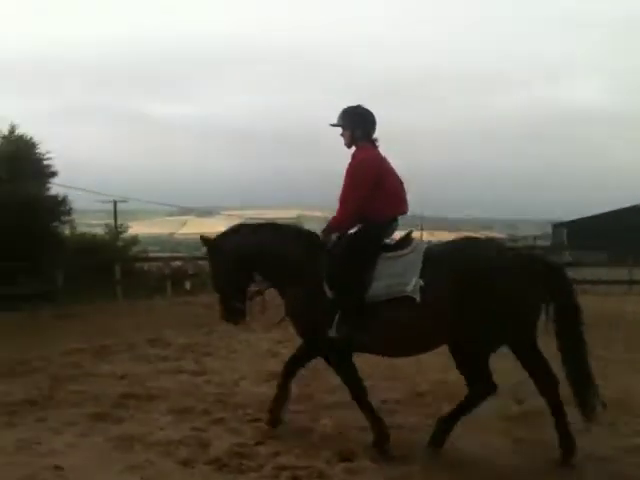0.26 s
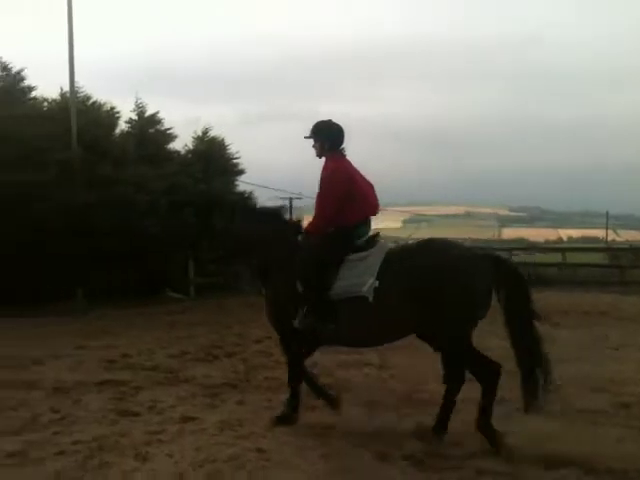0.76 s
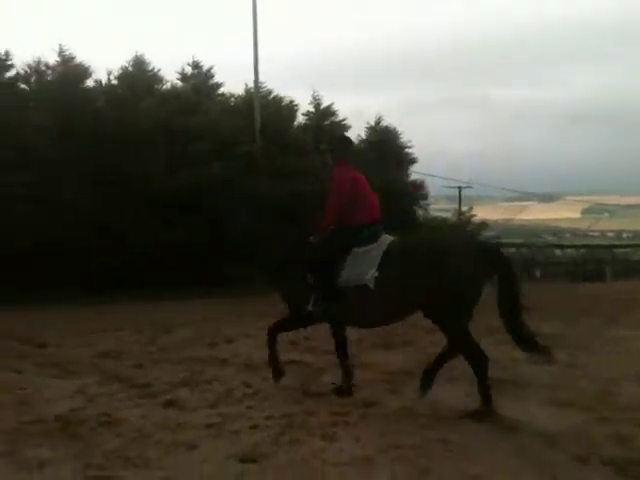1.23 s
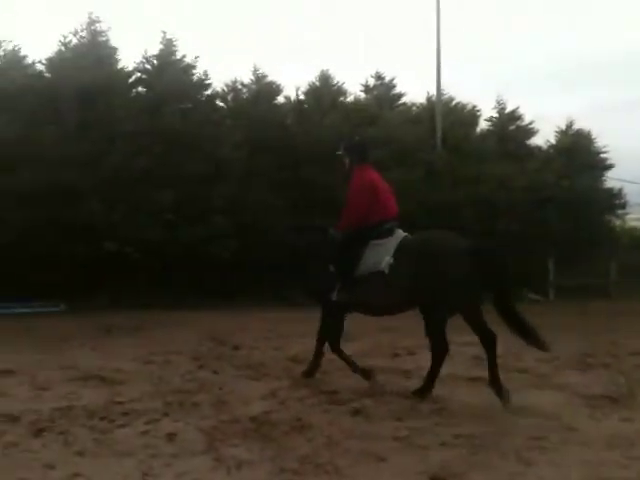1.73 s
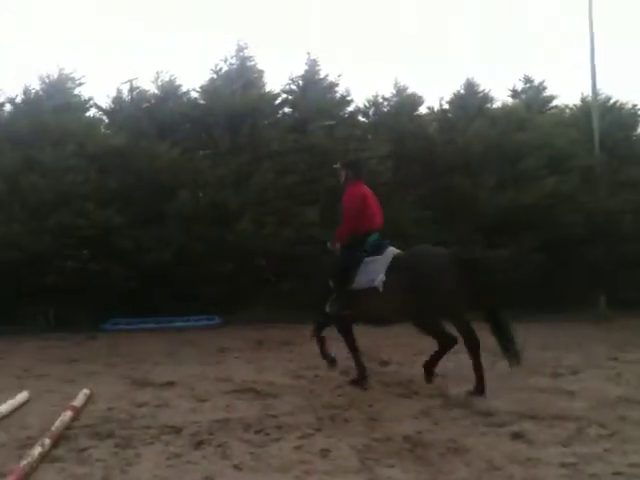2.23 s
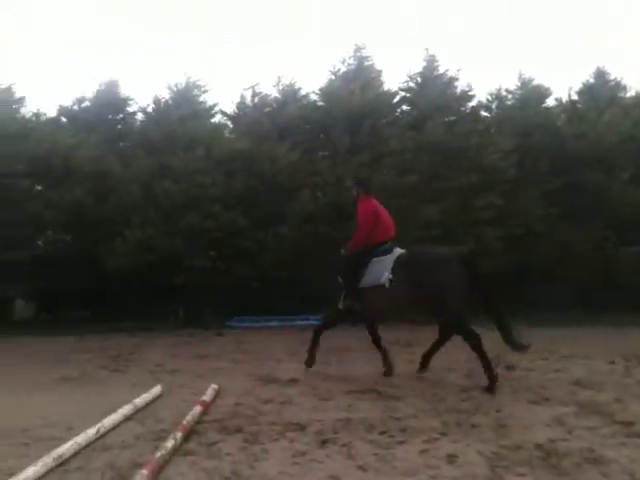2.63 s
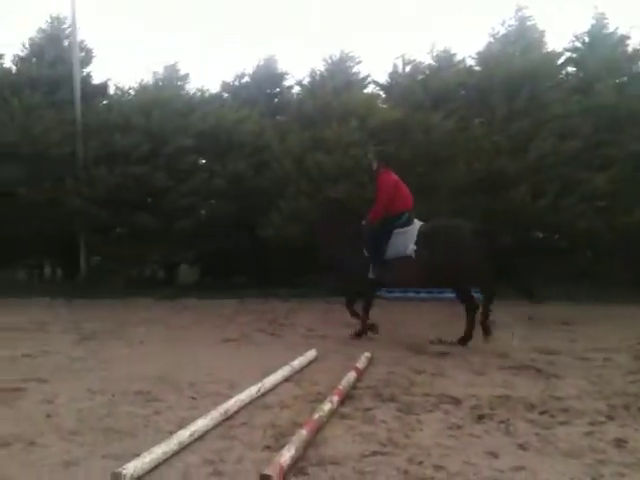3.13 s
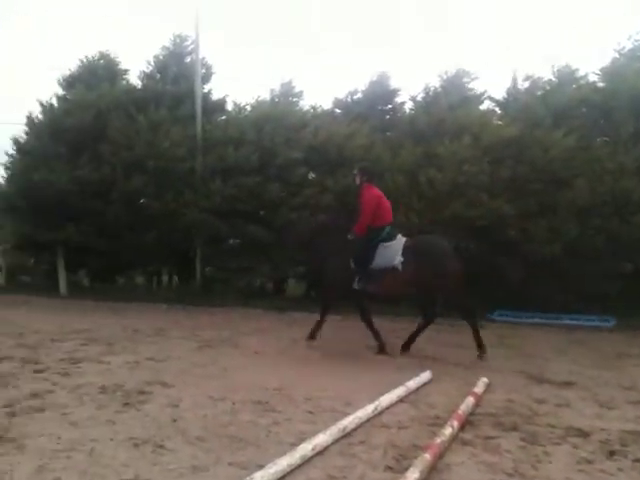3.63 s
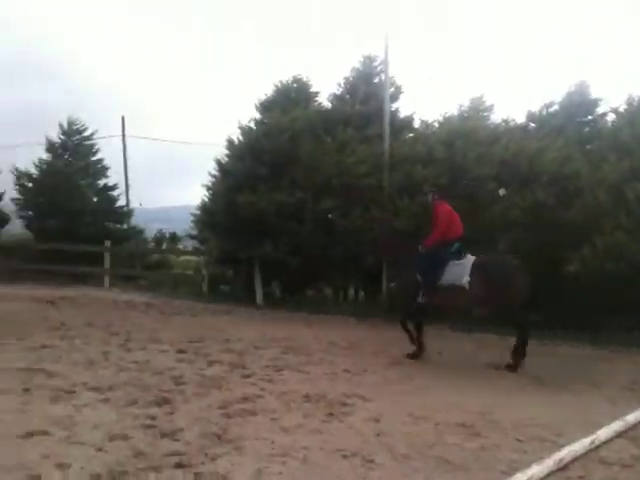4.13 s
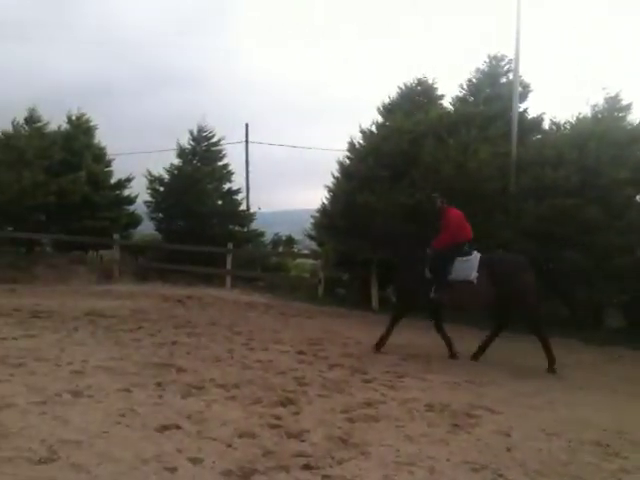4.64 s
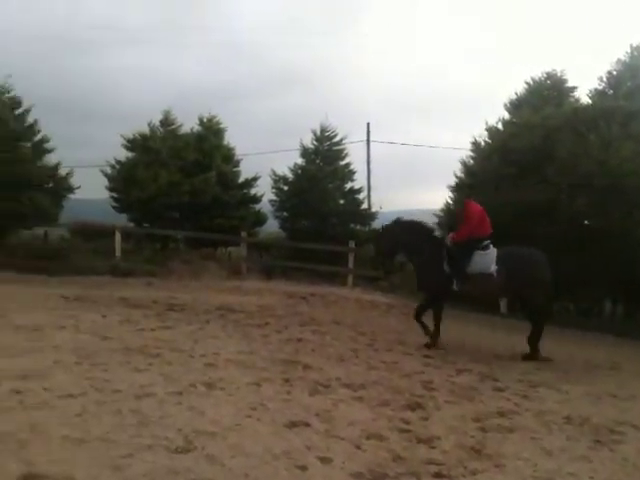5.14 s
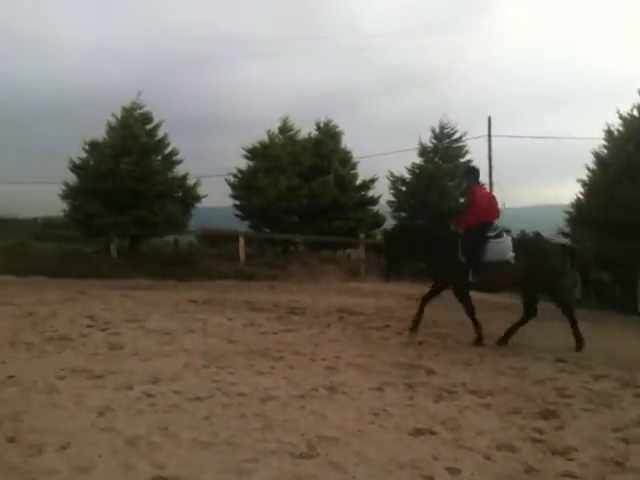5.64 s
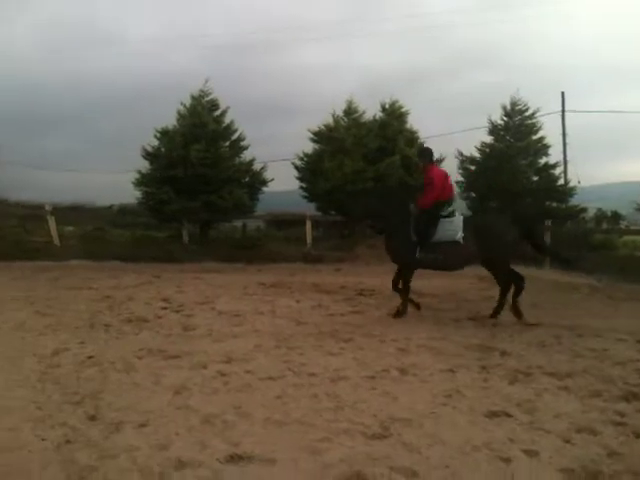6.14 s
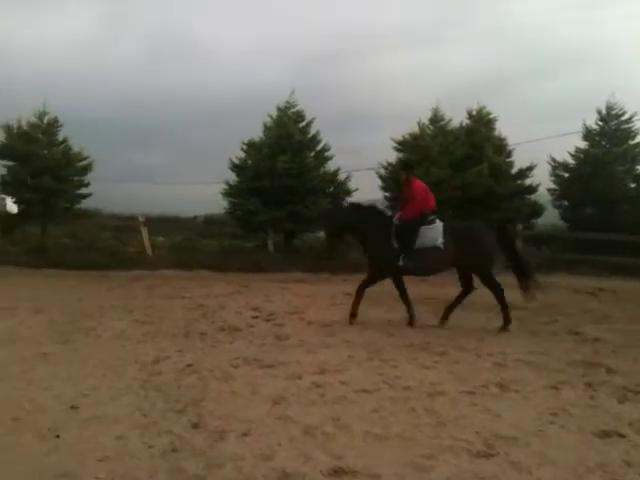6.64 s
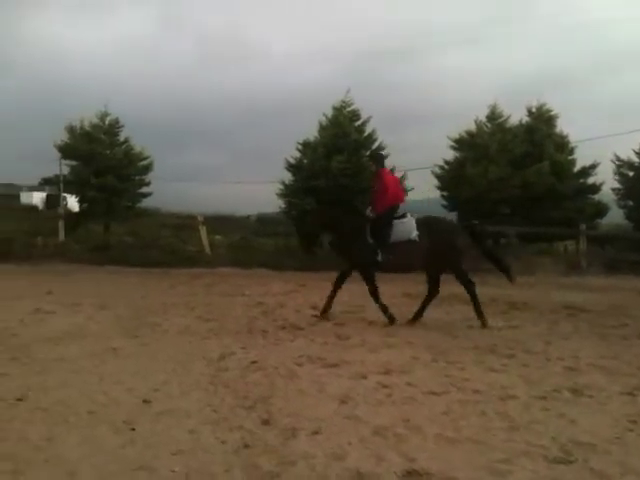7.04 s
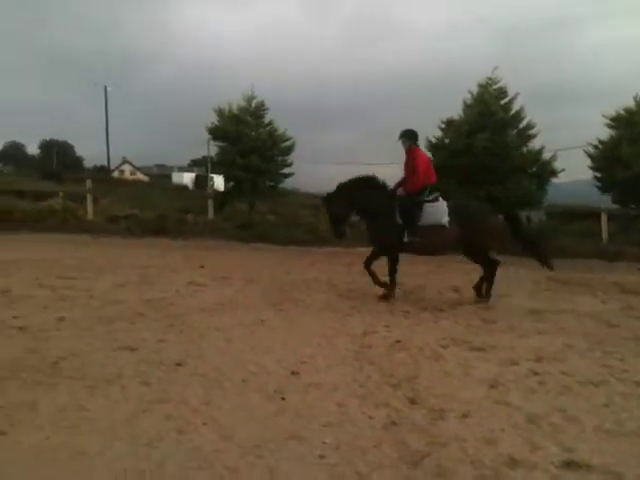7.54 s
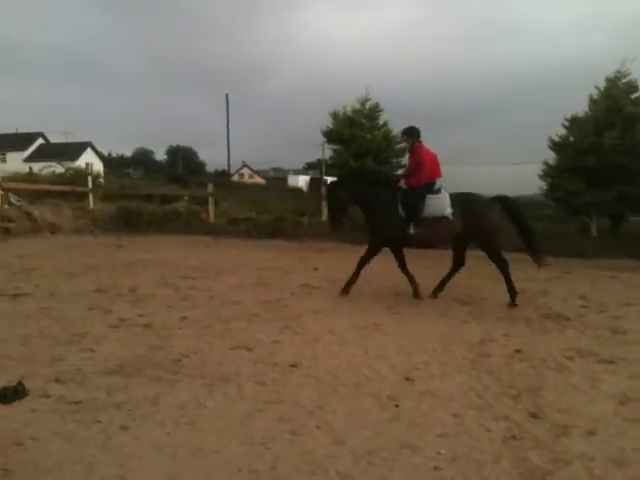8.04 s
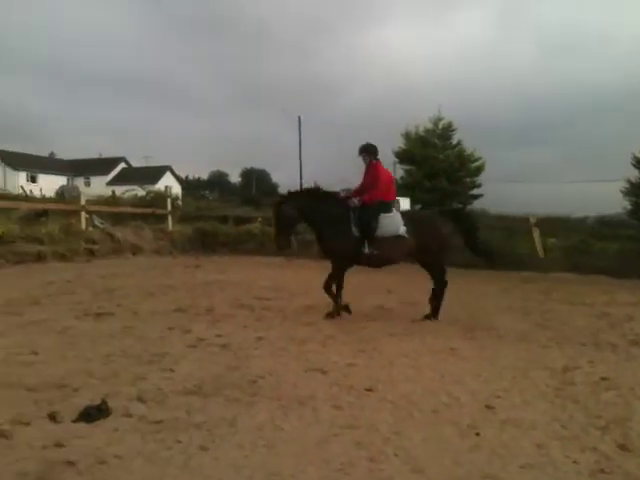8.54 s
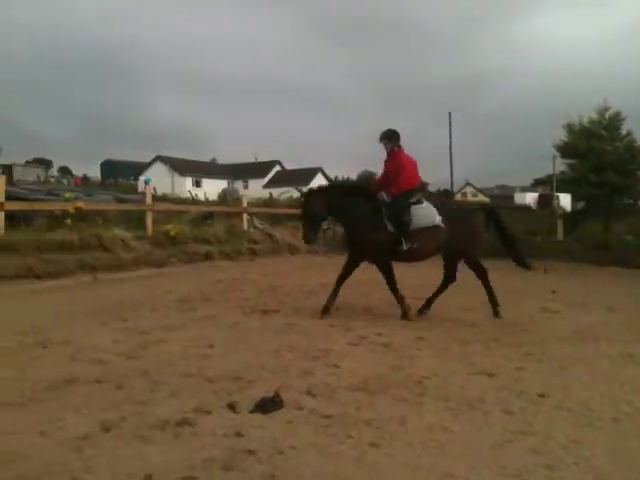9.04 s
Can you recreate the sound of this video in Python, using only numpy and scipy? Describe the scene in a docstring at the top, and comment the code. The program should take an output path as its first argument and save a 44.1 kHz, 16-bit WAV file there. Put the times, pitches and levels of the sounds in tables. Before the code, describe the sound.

Quiet open air, very soft overall. Muffled trotting hooves push and land in sand, with scrapes, brief slides and fine grain spray. Bumpy low wind thumps swell in the middle and return between six and nine seconds, often covering the steps. Tiny gliding squeaks like tack and crisp ticks appear irregularly. A horse snorts once, short and flapping, after the midpoint, and a faint rasp rises at the very end.

```python
"""Outdoor sand arena: a horse trots round at nearly three beats a second. Push-offs and landings are enveloped
grain noise plus damped clods; the spray dulls as the horse moves away. Toe scrapes, slides and fine sand are
shaped noise, hoof knocks damped tones. Gusts are lumpy filtered noise with low eddy swings at the microphone.
Thin high gliding squeaks, dry ticks, one snort of flapping pops and a faint late rasp stand out of quiet air noise."""
import sys
import numpy as np
from scipy.fft import rfft, irfft, next_fast_len
from scipy.io import wavfile
from scipy.ndimage import uniform_filter1d, map_coordinates

SR = 44100
rng = np.random.default_rng(int(sys.argv[2]) if len(sys.argv) > 2 else 0)


def waveform_to_disk(signal):
    """Save audio, clipped to [-1, 1], as 16-bit WAV at the path in sys.argv[1]."""
    frames = np.transpose(np.atleast_2d(signal))
    scaled = np.clip(frames, -1, 1) * 32767
    samples = np.round(scaled).astype(np.int16)
    wavfile.write(sys.argv[1], SR, samples)


N = 409248


def amp(db):
    """Decibels to gain."""
    return 10 ** (np.asarray(db) / 20)


def unit(x):
    """Scale to rms 1."""
    return x / np.sqrt(np.mean(x ** 2) + 1e-20)


def noise():
    """White noise over the whole scene."""
    return rng.standard_normal(N)


def clock(length_s):
    """Sample times [s] over length_s."""
    return np.arange(int(length_s * SR)) / SR


def add(track, start_s, sound):
    """Mix a sound into the track at start_s, or at 0 if that is negative."""
    start = max(round(start_s * SR), 0)
    part = track[start:start + len(sound)]
    part += sound[:len(part)]


def wobble(rate_hz):
    """Smooth random curve with rate_hz knots a second."""
    knots = rng.standard_normal(int(N * rate_hz / SR) + 4)
    return map_coordinates(knots, [np.arange(N) * rate_hz / SR])


def coloured(x, spectrum):
    """Minimum-phase filter through (Hz, dB) points, output at rms 1."""
    size = 2 * next_fast_len(len(x) // 2 + 4096)
    hz, db = np.transpose(spectrum)
    bin_hz = np.fft.rfftfreq(size, 1 / SR)
    log_gain = np.log(amp(np.interp(np.log(bin_hz + 1), np.log(hz), db)))
    # folding the cepstrum onto positive times makes the filter causal
    cepstrum = irfft(log_gain)
    cepstrum[1:size // 2] *= 2
    cepstrum[size // 2 + 1:] = 0
    response = np.exp(rfft(cepstrum))
    return unit(irfft(rfft(x, size) * response)[:len(x)])


def grains(rate_hz, spread_db):
    """Tiny impacts of random timing and size, rate_hz a second on average."""
    hits = rng.random(N) < rate_hz / SR
    return hits * rng.standard_normal(N) * amp(spread_db * rng.standard_normal(N))


def stroke(t, hold_s, rise_s, fall_s):
    """Exponential rise, hold until hold_s, exponential decay."""
    return (1 - np.exp(-t / rise_s)) * np.exp(-np.maximum(t - hold_s, 0) / fall_s)


# open air: (frequency [Hz], relative density [dB])
AIR_SPECTRUM = [(15, -44), (25, -24), (64, -18.5), (161, 6), (342, -1.5), (542, 2.5), (710, -4.5), (812, 0),
                (1090, -6), (1980, -7.5), (3050, -13), (4330, -9.5), (8270, -13), (14600, -19),
                (15800, -16.5)]


def air(level_db=-67.5, drift_db=-1.26):
    """Steady broadband hush whose level drifts a little."""
    return amp(level_db + drift_db * wobble(11)) * coloured(noise(), AIR_SPECTRUM)


# light air between gusts: (time [s], level before trim [dB])
LULL = [(0, -65), (.6, -59.5), (.9, -81), (1.5, -67.5), (2.8, -77), (3.3, -61.5), (3.9, -53), (4.8, -66),
        (5.35, -66.5), (5.9, -70), (6.3, -59.5), (6.78, -70), (7.2, -54), (8, -56), (9.2, -60.5)]
# gusts: (time [s], length [s], level at the end of the swell, before trim [dB])
GUSTS = [(0.055, 0.095, -59.5), (0.383, 0.08, -53), (1.768, 0.068, -60.5), (3.077, 0.098, -59.5),
         (3.334, 0.15, -48.5), (3.517, 0.16, -49.5), (3.888, 0.22, -50), (4.178, 0.17, -44.5),
         (4.28, 0.12, -45.5), (4.515, 0.24, -51), (4.821, 0.038, -58.5), (5.013, 0.023, -60),
         (6.18, .1, -66.5), (6.46, 0.042, -51.5), (6.554, 0.15, -52.5), (6.831, 0.22, -47),
         (7.1, 0.038, -52), (7.252, 0.17, -54.5), (7.548, 0.13, -55), (7.695, 0.05, -44.5),
         (7.793, 0.041, -48.5), (7.895, 0.041, -53), (8.1, 0.072, -55), (8.469, 0.2, -47),
         (8.72, 0.032, -45), (8.965, 0.23, -55)]
GUST_RISE_S, GUST_FALL_S, GUST_SWELL_DB = 0.0046, 0.03, 2


def flow_db():
    """Wind strength: each gust arrives, keeps growing to its end, then collapses into the light air."""
    flow = amp(np.interp(np.arange(N) / SR, *np.transpose(LULL)))
    for start_s, length_s, db in GUSTS:
        t = clock(length_s + 0.3)
        swell_db = GUST_SWELL_DB * np.minimum(t / length_s - 1, 0)
        add(flow, start_s, amp(db + swell_db) * stroke(t, length_s, GUST_RISE_S, GUST_FALL_S))
    return 20 * np.log10(flow)


# buffeting in a breeze: (frequency [Hz], relative density [dB])
BREEZE_SPECTRUM = [(25, -68), (50, -28.5), (80, -11), (120, 0.5), (180, -0.5), (260, -11.5), (350, -20),
                   (500, -44.5), (900, -59.5), (2000, -65)]
# buffeting in a hard gust: (frequency [Hz], relative density [dB])
GUST_SPECTRUM = [(25, -30), (50, -42), (80, -36), (120, -2), (190, -0.5), (270, 1), (370, -13),
                 (520, -21.5), (900, -35), (2000, -53.5)]


def buffeting(trim_db=-2.5, lump_db=4.5, hard_db=-43, calm_db=-62):
    """Turbulence on the microphone: stronger flow is louder and brighter."""
    level_db = flow_db()
    hardness = 1 / (1 + amp(2 * (hard_db - level_db)))
    turbulence = noise()
    soft = (1 - hardness) * coloured(turbulence, BREEZE_SPECTRUM)
    hard = hardness * coloured(turbulence, GUST_SPECTRUM)
    swirl = (soft + hard) * amp(lump_db * wobble(45))
    # level out slow power changes, so the flow sets the slow level
    power = uniform_filter1d(uniform_filter1d(swirl ** 2, size=3200), size=2000)
    swirl = swirl / np.sqrt(np.abs(power) + 1e-6)
    shedding = 1 / (1 + amp(calm_db - level_db) ** 2)  # fades out in calm air
    return amp(level_db + trim_db) * shedding * swirl


# trot beats: (landing time [s], nominal slide length [s], landing level [dB], push-off lead [s],
#              push-off level [dB], spray over crunch [dB])
BEATS = [(0.176, 0.068, -64, 0.18, -68.5, -7), (0.416, 0.28, -71.5, 0.13, -69.5, -5.5),
         (0.835, 0.19, -67.5, 0.12, -67, -8), (1.182, 0.22, -70, 0.15, -69, -5),
         (1.507, 0.21, -68.5, 0.12, -70.5, -7.5), (1.872, 0.064, -68, 0.17, -78, -8.5),
         (2.211, 0.17, -70.5, 0.152, -69, -6), (2.574, 0.02, -70, 0.2, -69, -11),
         (2.867, 0.086, -68.5, 0.16, -70, -6), (3.133, 0.27, -73.5, 0.12, -71, -8),
         (3.518, 0.059, -72.5, 0.12, -71, -4.5), (3.844, 0.045, -94, 0.12, -73, -8.5),
         (4.188, 0.21, -74.5, 0.16, -75, -2), (4.556, 0.2, -80, 0.17, -74, -10),
         (5.01, 0.15, -75, 0.19, -76.5, 1.5), (5.405, 0.17, -72, 0.23, -79.5, 0.5),
         (5.752, 0.071, -71.5, 0.19, -72.5, -7), (6.199, 0.065, -73, 0.097, -77.5, -1),
         (6.542, 0.094, -74.5, 0.23, -74, -4), (6.948, 0.21, -75, 0.19, -75, 1.5),
         (7.402, 0.12, -73.5, 0.33, -92, 1), (7.658, 0.12, -86, 0.093, -70.5, -5.5),
         (8.25, 0.084, -71.5, 0.14, -75, -2), (8.6, 0.11, -83, 0.18, -72, -12),
         (8.919, 0.4, -75, 0.13, -71.5, -1.5)]
PUSH_S, PUSH_SPRAY_DB = 0.1, 2.5  # nominal push-off length; extra spray against a landing


def scuffs():
    """Push-off and landing of each beat: (time [s], nominal length [s], crunch [dB], spray [dB])."""
    pushes = [(s - lead_s, PUSH_S, db, db + spray_db + PUSH_SPRAY_DB)
              for s, _, _, lead_s, db, spray_db in BEATS]
    landings = [(s, slide_s, db, db + spray_db) for s, slide_s, db, _, _, spray_db in BEATS]
    return pushes + landings


def clods(rate_hz, centre_hz, scatter, cycles, spread_db):
    """Collapsing sand lumps: each a few damped swings at its own pitch and size."""
    pitch, size = rng.standard_normal((int(rate_hz * N / SR), 2)).T
    hz = np.clip(centre_hz * np.exp(scatter * pitch), 250, 3000)[:, None]
    t = clock(0.012)
    envelope = np.exp(-hz * t / cycles) * (1 - np.exp(-2 * hz * t))
    swings = amp(spread_db * size)[:, None] * np.sin(2 * np.pi * hz * t) * envelope
    start = (rng.random(len(size)) * N).astype(int)
    places = start[:, None] + np.arange(len(t))
    return unit(np.bincount(places.ravel(), swings.ravel(), N)[:N])


# hoof thud in deep sand: (frequency [Hz], relative density [dB])
THUD_SPECTRUM = [(80, -25), (170, 1), (300, -17.5), (450, 0.5), (700, -13.5), (1000, -12), (2000, -27.5)]
# crushed footing: (frequency [Hz], relative density [dB])
CRUNCH_SPECTRUM = [(100, -16), (200, -3.5), (330, -18.5), (520, -3), (850, -7.5), (1200, -7), (2000, -7),
                   (3100, -15.5), (5000, -32)]
# flung grains: (frequency [Hz], relative density [dB])
SPRAY_SPECTRUM = [(1500, -35.5), (3100, -0.5), (4200, 11), (5600, 7.5), (7000, 6), (8500, 9.5),
                  (10500, 2.5), (12500, -24), (15500, -44)]
# coarse grit thrown close by: (frequency [Hz], relative density [dB])
GRIT_SPECTRUM = [(2000, -30), (4500, -8), (7000, 2), (10000, -8), (12500, 3), (15500, -14)]
# small stones in the footing: (frequency [Hz], relative density [dB])
STONE_SPECTRUM = [(500, -10), (1100, -8), (2000, 2), (3100, 3), (4500, 10), (9000, -3), (12000, -8),
                  (15500, -10)]


def hooves(crunch_db=-1.56, thud_db=-4, grit_db=-4, stone_db=-6, clump_db=5, spray_clump_db=4.5, near_db=-66):
    """Each hoof thuds softly, crushes clods and flings grains and stones; stronger sprays are brighter."""
    land, press, fling = np.zeros((3, N))
    for start_s, length_s, low_db, high_db in scuffs():
        t = clock(length_s + 0.91)
        add(land, start_s, amp(low_db) * stroke(t, 0.71 * length_s, rise_s=0.0047, fall_s=0.049))
        add(press, start_s, amp(low_db) * stroke(t, 0.83 * length_s, rise_s=0.0044, fall_s=0.04))
        add(fling, start_s, amp(high_db) * stroke(t, 0.58 * length_s, rise_s=0.0022, fall_s=0.12))
    thud = amp(thud_db) * coloured(noise(), THUD_SPECTRUM)
    crushed = coloured(grains(rate_hz=3000, spread_db=1), CRUNCH_SPECTRUM)
    crunch = amp(crunch_db) * unit(amp(clump_db * wobble(90)) * crushed)
    lumps = clods(rate_hz=700, centre_hz=854, scatter=0.602, cycles=2.1, spread_db=5.5)
    flung = coloured(grains(rate_hz=5000, spread_db=4), SPRAY_SPECTRUM)
    spray = unit(amp(spray_clump_db * wobble(90)) * flung)
    grit = amp(grit_db) * coloured(grains(rate_hz=2600, spread_db=2.8), GRIT_SPECTRUM)
    stones = amp(stone_db) * coloured(grains(rate_hz=70, spread_db=3), STONE_SPECTRUM)
    nearness = fling / (fling + amp(near_db))  # only close, strong scuffs keep their sparkle
    return land * thud + press * (crunch + lumps) + fling * (spray + stones + nearness * grit)


def swishes(rows, spectrum, trim_db, clump_db):
    """Sand moved by a hoof: dense noise in short strokes with uneven level."""
    level = np.zeros(N)
    for start_s, length_s, db in rows:
        t = clock(length_s + 0.2)
        add(level, start_s, amp(db + trim_db) * stroke(t, length_s, rise_s=0.0057, fall_s=0.0089))
    return level * amp(clump_db * wobble(120)) * coloured(noise(), spectrum)


# toe scrapes: (time [s], length [s], level before trim [dB])
SCRAPES = [(.005, 0.019, -64), (.32, 0.033, -67.5), (.525, 0.038, -66.5), (.605, 0.015, -68),
           (3.54, 0.036, -71), (3.795, .02, -69), (4.42, 0.036, -68), (4.865, 0.031, -69),
           (5.207, 0.023, -65), (5.447, 0.012, -63.5), (7.8, .02, -70), (8.522, 0.011, -69)]
# damp sand: (frequency [Hz], relative density [dB])
DAMP_SAND_SPECTRUM = [(250, -11), (500, -10), (850, 3.5), (1300, -4.5), (2200, -8), (3200, -18),
                      (8000, -17.5)]
# fanned-out fine sand: (time [s], length [s], level before trim [dB])
SWISHES = [(.305, 0.036, -70), (0.424, 0.074, -64.5), (0.828, 0.082, -63), (0.92, 0.061, -66),
           (0.99, 0.3, -71.5), (3.533, 0.029, -65.5), (6.21, 0.042, -79), (6.542, 0.018, -61.5),
           (8.8, 0.035, -74)]
# fine sand: (frequency [Hz], relative density [dB])
FINE_SAND_SPECTRUM = [(2000, -19), (3300, -17), (5000, -3.5), (6500, 2), (8000, -2), (10400, 1),
                      (12000, -9), (15500, -9)]
# hoof slides: (time [s], length [s], level before trim [dB])
SLIDES = [(5.55, 0.14, -72), (5.77, 0.04, -70.5), (5.96, 0.066, -76), (6.22, 0.04, -69), (6.39, 0.054, -75),
          (6.995, .05, -67), (7.62, 0.063, -66), (8.27, 0.12, -70.5), (8.93, 0.11, -70)]
# hollow wash of loose sand: (frequency [Hz], relative density [dB])
LOOSE_SAND_SPECTRUM = [(400, -24), (650, 4.5), (850, 10), (1150, -15), (2000, -21.5), (4000, -41)]


def moving_sand():
    """Toe scrapes and slides are dull, flying fine sand is bright."""
    scrapes = swishes(SCRAPES, DAMP_SAND_SPECTRUM, trim_db=1.5, clump_db=4)
    fine = swishes(SWISHES, FINE_SAND_SPECTRUM, trim_db=2.5, clump_db=2)
    slides = swishes(SLIDES, LOOSE_SAND_SPECTRUM, trim_db=0.5, clump_db=0.5)
    return scrapes + fine + slides


EDDY_RATE_HZ, EDDY_OVER_FLOW_DB, EDDY_HZ, EDDY_SCATTER = 12, 3, 185, 0.08
EDDY_CALM_DB = -57  # below this flow the eddies fade out


def lesser_eddies():
    """Randomly timed vortices as strong as their wind: (time [s], peak before trim [dB], pitch [Hz])."""
    chance = rng.random((int(EDDY_RATE_HZ * N / SR), 2))
    s = (np.arange(len(chance)) + chance[:, 0]) / EDDY_RATE_HZ
    wind_db = np.interp(s, np.arange(N) / SR, flow_db())
    db = wind_db + EDDY_OVER_FLOW_DB + np.minimum(wind_db - EDDY_CALM_DB, 0)
    hz = EDDY_HZ * np.exp(EDDY_SCATTER * (4 * chance[:, 1] - 2))
    return list(zip(s, db, hz))


# strongest eddies: (time of centre [s], peak before trim [dB], pitch [Hz])
EDDIES = [(0.39, -29.5, 181), (3.355, -40, 193), (3.404, -35.5, 214), (3.454, -35.5, 194),
          (3.508, -38.0, 145), (3.628, -30, 215), (3.651, -31, 155), (3.666, -33.5, 197), (3.705, -31, 257),
          (3.93, -36, 180), (3.961, -32, 205), (3.999, -33, 195), (4.031, -35.5, 193), (4.059, -32, 162),
          (4.083, -43, 188), (4.207, -30.5, 205), (4.216, -29.5, 213), (4.243, -42, 181), (4.295, -29, 188),
          (4.312, -29.5, 181), (4.331, -29, 282), (4.356, -35, 203), (4.371, -34, 223), (4.388, -35.0, 204),
          (4.575, -41, 169), (4.598, -38, 161), (4.688, -39, 215), (6.572, -41.5, 252), (6.636, -29, 219),
          (6.668, -36, 187), (6.875, -44.5, 162), (6.983, -35.5, 200), (7.018, -39, 205), (7.037, -39, 180),
          (7.051, -35, 186), (7.123, -39.5, 177), (7.292, -36.5, 180), (7.308, -31.5, 206),
          (7.394, -44, 139), (7.592, -39.0, 169), (7.647, -37.5, 139), (7.705, -42, 181),
          (7.729, -34.5, 169), (7.749, -37, 178), (7.758, -31, 185), (7.834, -40, 185), (7.849, -37.5, 177),
          (7.903, -40.5, 153), (8.513, -33.5, 180), (8.553, -38, 175), (8.575, -34, 184), (8.651, -33, 245),
          (8.672, -41.5, 167), (8.769, -35, 172), (9.008, -41, 197), (9.05, -41.5, 186)]
# fine turbulence round a vortex: (frequency [Hz], relative density [dB])
FRAY_SPECTRUM = [(100, -26.5), (250, -2), (400, 8.5), (550, -14), (900, -18.5), (2000, -60)]


def eddies(trim_db=-0.5, cycles=0.7, fray_db=-21):
    """A vortex crosses the microphone port: two or three soft swings, frayed by finer turbulence."""
    track = np.zeros(N)
    t = clock(0.06) - 0.03
    for centre_s, db, hz in list(EDDIES) + lesser_eddies():
        swing = np.sin(2 * np.pi * (hz * t + rng.random()))
        fray = amp(fray_db) * coloured(rng.standard_normal(len(t)), FRAY_SPECTRUM)
        envelope = np.exp(-0.5 * (hz * t / cycles) ** 2)
        add(track, centre_s + t[0], amp(db + trim_db) * (swing + fray) * envelope)
    return track


FAINT_SNAP_DB, FAINT_BODY_DB, FAINT_SPREAD_DB = -3.5, -22, 5.5  # over the landing, before trim; snap spread


def faint_ticks():
    """One stray tick per landing: (time [s], snap before trim [dB], body before trim [dB], pitch [Hz])."""
    rows = []
    for landing_s, slide_s, db, *_ in BEATS:
        tick_s = landing_s + slide_s * rng.random()
        snap_db = db + FAINT_SNAP_DB + FAINT_SPREAD_DB * rng.standard_normal()
        rows.append((tick_s, snap_db, db + FAINT_BODY_DB, rng.uniform(4500, 9000)))
    return rows


# clearest ticks: (time [s], snap before trim [dB], body before trim [dB], pitch [Hz])
TICKS = [(0.0724, -61.5, -57, 7500), (0.114, -63, -60, 6470), (0.186, -57.5, -55, 9100),
         (0.197, -65, -56, 7000), (0.208, -64, -70, 8600), (.255, -71, -75, 8000), (0.4887, -63, -83, 8700),
         (0.541, -70.5, -72, 6000), (.742, -69, -64, 5000), (0.825, -67, -70, 9500),
         (1.182, -67.5, -78, 8900), (1.427, -74, -78, 8000), (1.553, -72, -65, 6000),
         (1.587, -67.5, -72, 5800), (1.8916, -82, -55, 4500), (2.398, -68, -74, 5270),
         (2.4386, -61, -81, 5530), (2.5245, -60, -75, 9000), (2.5731, -72, -55, 4300),
         (2.774, -67.5, -66, 4770), (2.879, -69, -66, 4500), (3.556, -68, -66, 8000),
         (3.624, -74.5, -64, 6000), (3.8472, -66, -69, 9200), (3.8515, -68, -74, 4740),
         (5.042, -62.5, -79, 5650), (5.8938, -63, -57.5, 5850), (6.098, -68, -57, 4460),
         (6.1091, -66, -79, 6000), (6.555, -74, -72, 8060), (6.605, -69, -78, 8700),
         (6.9135, -61.5, -57, 5140), (7.163, -78, -55, 4480), (7.2173, -66, -82, 8400),
         (8.633, -59.5, -55.5, 5630), (9.066, -66.5, -53.5, 6600)]
# tick crack: (frequency [Hz], relative density [dB])
TICK_SPECTRUM = [(1000, -29), (3000, -10), (4300, 10), (6000, 2.5), (8700, 11), (11000, 3.5), (13000, -6),
                 (16000, 1)]


def ticks(snap_trim_db=8.5, body_trim_db=-4, ring_fall_s=0.0003, ring_db=-1, body_fall_s=0.0097, tail_db=-20):
    """Dry ticks: sharp crack and very short pitched ring over a duller body."""
    track, t = np.zeros(N), clock(0.06)
    first = t < 0.004
    crack_envelope = np.exp(-t / 0.0003) + amp(tail_db) * np.exp(-t / 0.003)

    def onset_unit(x):
        """Scale to unit deviation over the first 4 ms."""
        return x / x[first].std()

    for start_s, snap_db, low_db, hz in list(TICKS) + faint_ticks():
        crack_noise, body_noise = rng.standard_normal((2, len(t)))
        crack = coloured(crack_noise * crack_envelope, TICK_SPECTRUM)
        ring = np.sin(2 * np.pi * hz * t) * np.exp(-t / ring_fall_s) * (1 - np.exp(-hz * t))
        snap = onset_unit(onset_unit(crack) + amp(ring_db) * onset_unit(ring))
        body = onset_unit(coloured(body_noise * np.exp(-t / body_fall_s), CRUNCH_SPECTRUM))
        add(track, start_s, amp(snap_db + snap_trim_db) * snap + amp(low_db + body_trim_db) * body)
    return track


# firmest hoof knocks: (time [s], level before trim [dB], pitch [Hz])
KNOCKS = [(0.115, -40.5, 445), (.236, -49, 624), (.187, -44, 1200), (0.774, -44, 920), (0.793, -39, 473),
          (1.463, -53, 393), (1.544, -49, 490), (1.891, -47, 547), (2.259, -50, 506), (2.489, -49, 487),
          (2.573, -42.5, 488), (2.704, -49, 750), (2.72, -49, 592), (2.92, -55, 560), (3.961, -49, 560),
          (4.289, -41, 563), (4.329, -41, 615), (6.204, -45, 480), (6.27, -51, 440), (7.024, -43, 420),
          (8.658, -37, 510), (8.762, -40, 503)]


def knocks(trim_db=-1, cycles=2, hollow_db=-14):
    """A hoof meets firmer ground: dead knock with one upper resonance."""
    track, t = np.zeros(N), clock(0.05)
    for start_s, db, hz in KNOCKS:
        upper_hz = rng.uniform(1.41, 2.21) * hz
        ring = np.sin(2 * np.pi * hz * t) + amp(hollow_db) * np.sin(2 * np.pi * upper_hz * t)
        envelope = np.exp(-hz * t / cycles) * (1 - np.exp(-hz * t))
        add(track, start_s, amp(db + trim_db) * ring * envelope)
    return track


# squeaks: (time [s], length [s], mid pitch [Hz], glide [Hz], level before trim [dB],
#           octave over fundamental [dB])
SQUEAKS = [(0.99, 0.029, 5800, 32, -65, -18), (1.023, 0.046, 5630, -88, -52.5, -3.5),
           (1.09, 0.081, 5600, 2, -78, 0), (1.12, 0.038, 5020, 0, -82, 13),
           (1.219, .01, 5600, -2, -66, -20), (1.244, 0.027, 5850, -250, -54, -18),
           (1.39, 0.025, 5680, 87, -69, -27), (1.584, 0.0084, 5590, -61, -59.5, -3),
           (2.912, 0.013, 5650, 0, -72, -2), (3.332, 0.035, 5770, -170, -55.5, -12),
           (3.457, 0.012, 5650, 0, -69, -20), (3.564, 0.014, 5780, 90, -64, -11),
           (3.59, .025, 5780, -17, -75, -20), (4.71, 0.017, 5800, -160, -65, -20),
           (4.798, 0.03, 8220, 80, -72, -30), (4.922, 0.031, 5650, -82, -66.5, -6.5),
           (4.966, 0.029, 5600, 0, -69, -14), (5.366, 0.013, 5850, -2, -76, -27),
           (5.512, 0.043, 5670, -150, -71, -21), (6.115, 0.035, 5850, -42, -77, 4),
           (6.146, 0.048, 5680, -78, -64, -4.5), (6.218, 0.025, 5640, 0, -72, -20),
           (6.322, 0.016, 5600, -80, -60.5, -12), (6.345, 0.038, 5630, 140, -68, -14),
           (6.384, 0.042, 5800, 176, -66.5, -27), (6.401, 0.031, 8250, 80, -61, -30),
           (6.565, .02, 5900, 0, -70, -12), (7.928, 0.018, 5670, -70, -67.5, -12),
           (8.241, 0.016, 5660, 60, -69, -12), (8.527, 0.08, 1075, 0, -77, -30),
           (8.916, 0.019, 5860, -260, -55.5, -19), (8.96, 0.014, 5800, 28, -61.5, -22),
           (9.15, 0.016, 5620, -120, -66, -12.5), (9.156, 0.09, 5600, -62, -70, 3)]


def squeaks(trim_db=4, waver_hz=26, rough_db=4, ring_db=-19, ring_fall_s=0.038, arch_db=5):
    """Thin gliding tones that swell and fade, with an octave overtone and a faint ring after each."""
    track = np.zeros(N)
    waver, rough = waver_hz * wobble(900), amp(rough_db * wobble(600))
    for start_s, length_s, pitch_hz, glide_hz, db, octave_db in SQUEAKS:
        t = clock(length_s + 0.27)
        here = np.minimum(round(start_s * SR) + np.arange(len(t)), N - 1)
        along = np.minimum(t / length_s, 1) - 0.5
        phase = 2 * np.pi * np.cumsum(pitch_hz + glide_hz * along + waver[here]) / SR
        arch = amp(arch_db * (np.cos(np.pi * along) - 1))
        envelope = arch * stroke(t, length_s, rise_s=0.002, fall_s=0.0016)
        tone = envelope * (np.sin(phase) + amp(octave_db) * np.sin(2 * phase))
        ring = amp(ring_db) * stroke(t, length_s, rise_s=0.0057, fall_s=ring_fall_s) * np.sin(phase)
        add(track, start_s, amp(db + trim_db) * rough[here] * (tone + ring))
    return track


SNORT_S, SNORT_LENGTH_S, SNORT_DB = 5.84, 0.158, -66.5
FLUTTER_START_HZ, FLUTTER_END_HZ = 122, 46  # slows as the breath runs out
# nostrils: (frequency [Hz], relative density [dB])
NOSTRIL_SPECTRUM = [(100, -13), (200, -8), (330, -4), (430, -2), (560, -8.5), (780, -16), (2000, -33)]


def snort(breath_db=-24):
    """Nostrils flap ever more slowly and deeply: dull pops in a little rushing air."""
    track, t = np.zeros(N), clock(SNORT_LENGTH_S + 0.026)
    rate_hz = np.interp(t, [0, SNORT_LENGTH_S], [FLUTTER_START_HZ, FLUTTER_END_HZ])
    pops = np.diff(np.floor(np.cumsum(rate_hz) / SR), prepend=0)  # one impulse per flutter cycle
    depth = np.sqrt(FLUTTER_START_HZ / rate_hz) * amp(rng.standard_normal(len(t)))
    rush = amp(breath_db) * np.maximum(1 - t / SNORT_LENGTH_S, 0) * rng.standard_normal(len(t))
    breath = (pops * depth + rush) * stroke(t, SNORT_LENGTH_S, rise_s=0.015, fall_s=0.005)
    add(track, SNORT_S, amp(SNORT_DB) * coloured(breath, NOSTRIL_SPECTRUM))
    return track


# rasp swell: (time [s], level [dB])
RASP_LEVEL = [(9.18, -90), (9.21, -74), (9.25, -68), (9.28, -67)]
# rasp resonances: (frequency [Hz], relative density [dB])
RASP_SPECTRUM = [(1000, -14), (2400, -15), (2750, 0), (3100, -15), (3500, -13), (3780, -3), (4200, -18),
                 (8000, -35)]


def rasp():
    """Faint noise swells near the end in two narrow resonances."""
    level_db = np.interp(np.arange(N) / SR, *np.transpose(RASP_LEVEL), left=-np.inf)
    return amp(level_db) * coloured(noise(), RASP_SPECTRUM)


def scene():
    """Everything meets at one microphone."""
    wind = air() + buffeting() + eddies()
    footing = hooves() + moving_sand() + ticks() + knocks()
    return (wind + footing + squeaks() + snort() + rasp())[None]


def record(dry, top_hz=15850):
    """The recorder keeps nothing above its band limit."""
    size = next_fast_len(N + 8192)
    passband = np.fft.rfftfreq(size, 1 / SR) < top_hz
    return irfft(rfft(dry, size) * passband, size)[:, :N]


dry = scene()
out = record(dry)
waveform_to_disk(out)
```